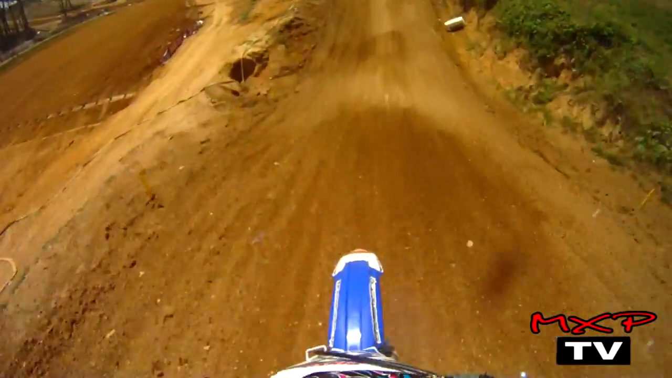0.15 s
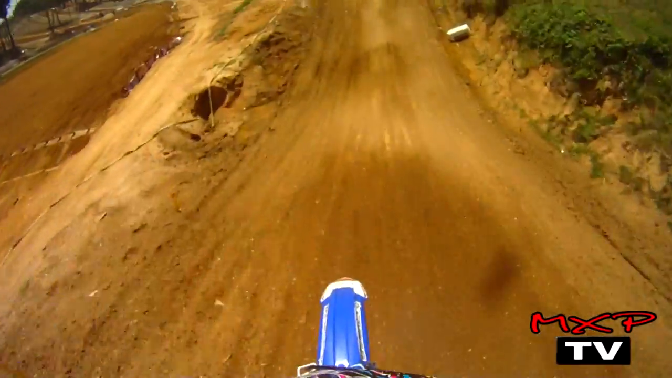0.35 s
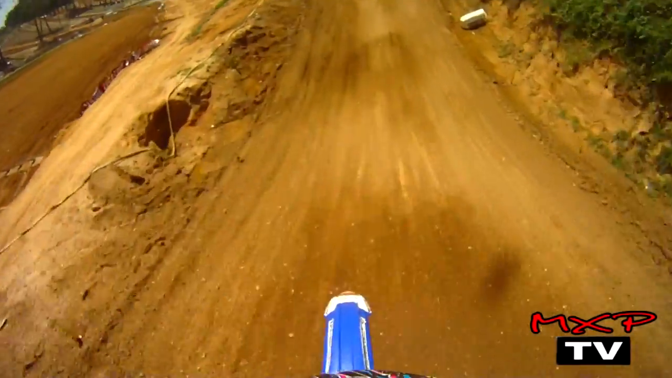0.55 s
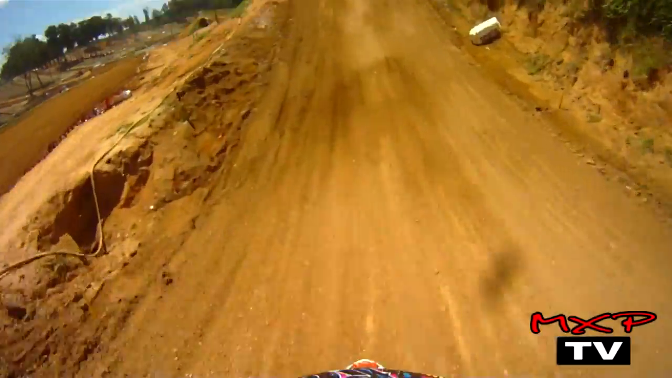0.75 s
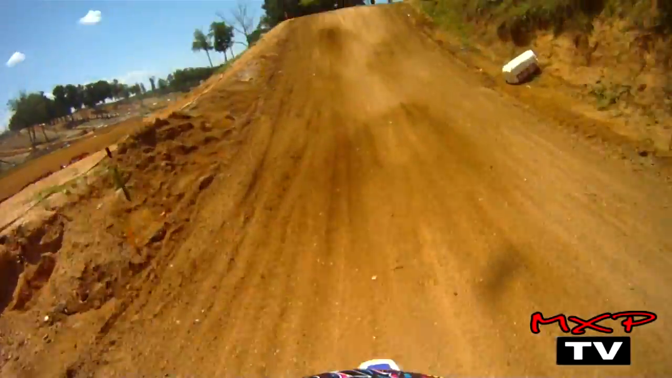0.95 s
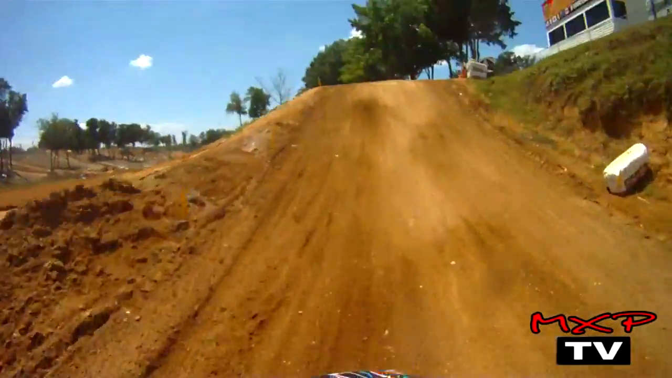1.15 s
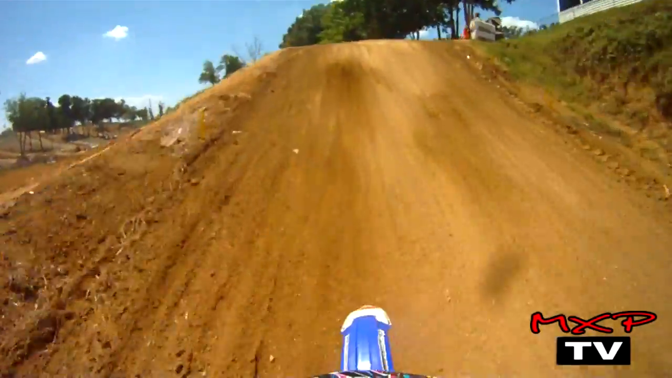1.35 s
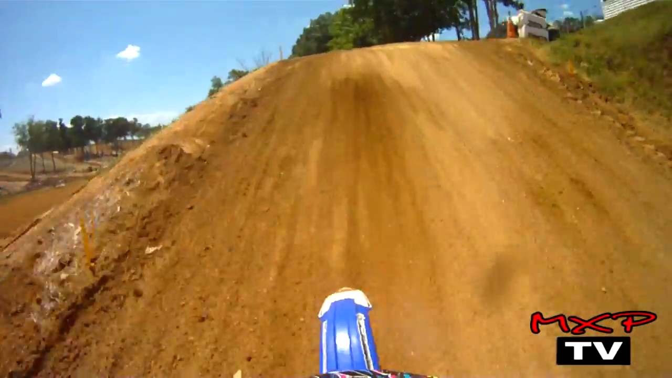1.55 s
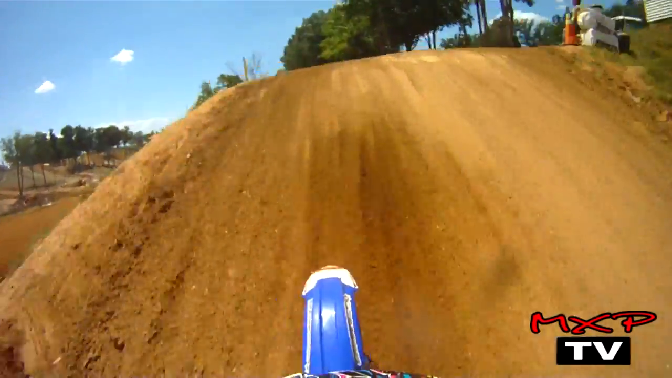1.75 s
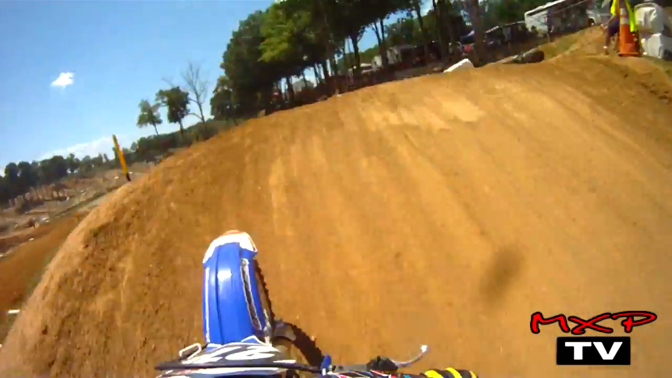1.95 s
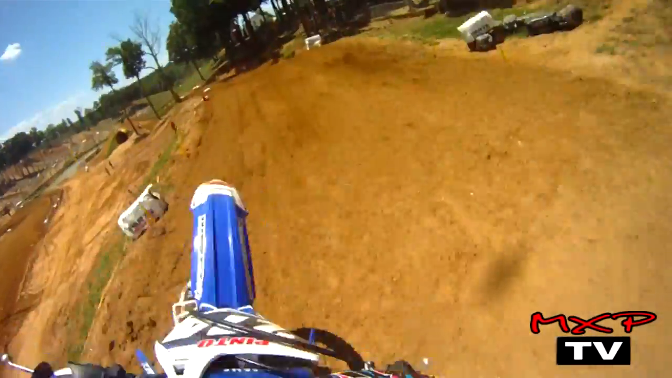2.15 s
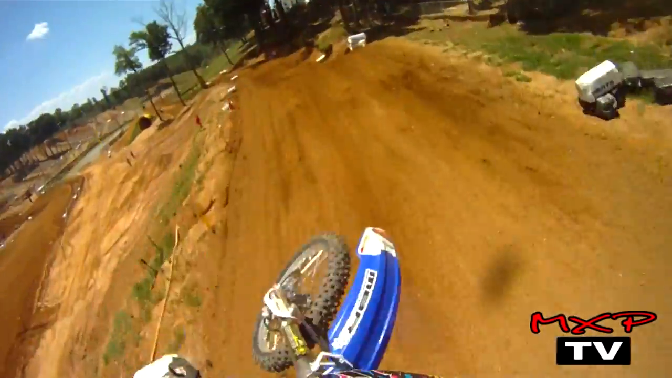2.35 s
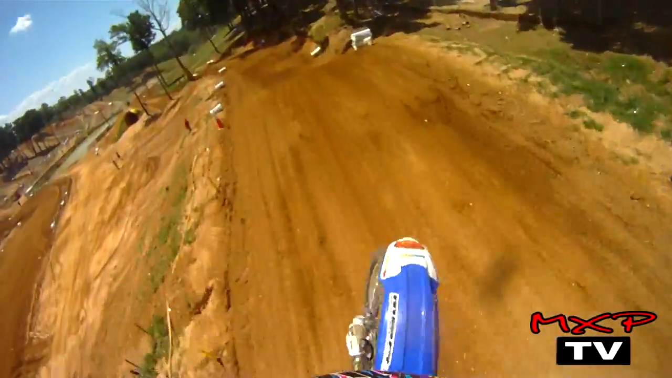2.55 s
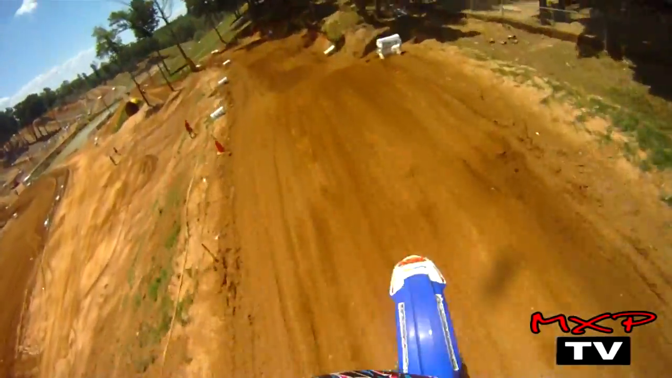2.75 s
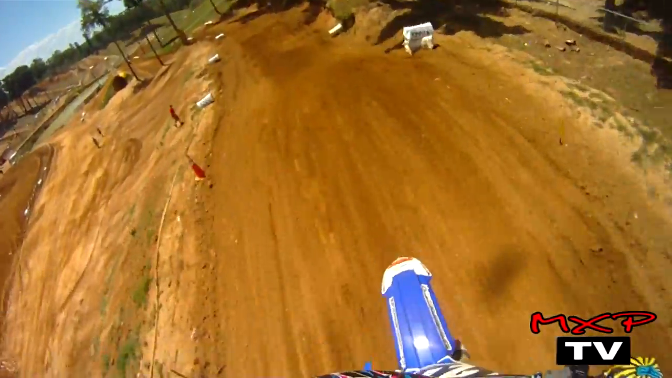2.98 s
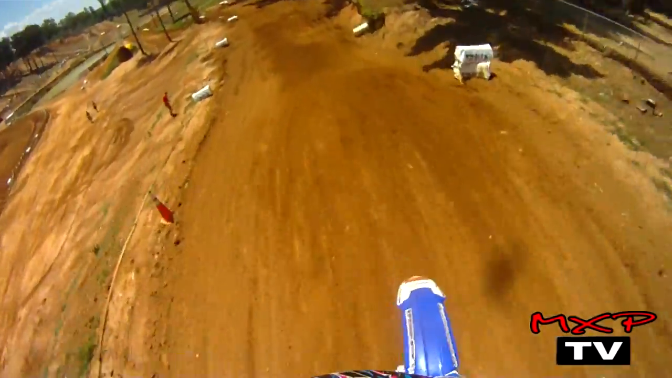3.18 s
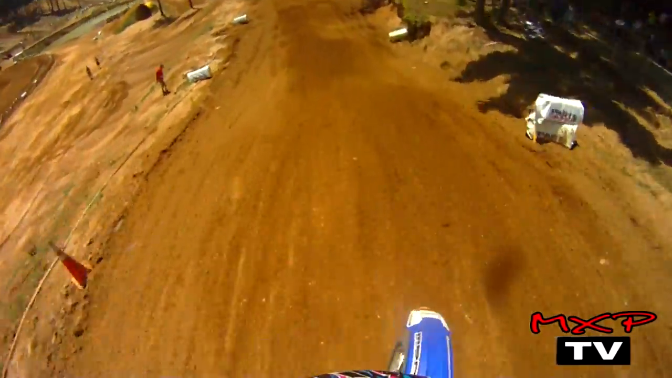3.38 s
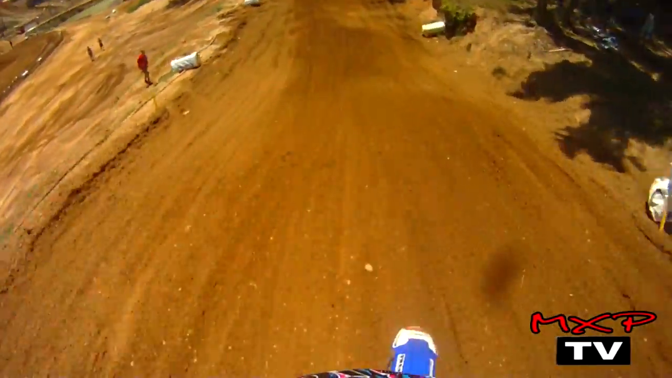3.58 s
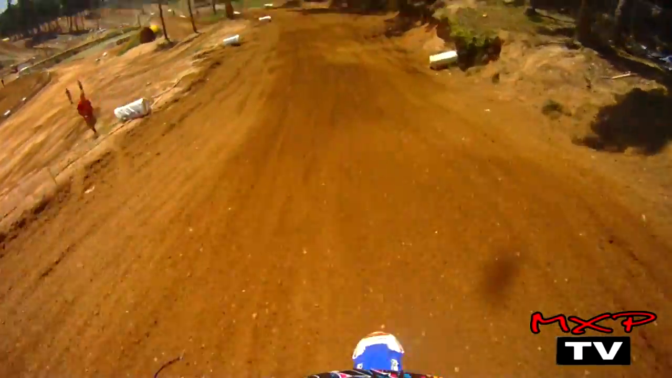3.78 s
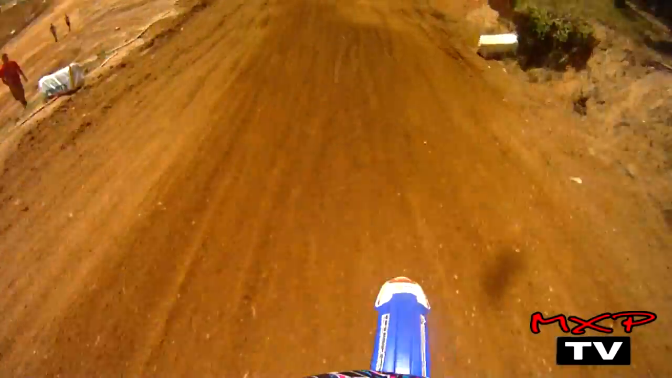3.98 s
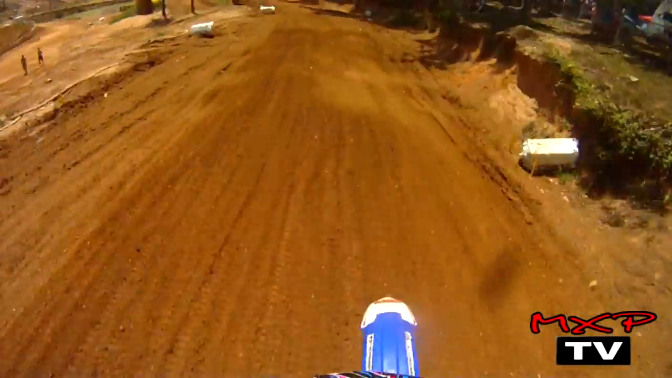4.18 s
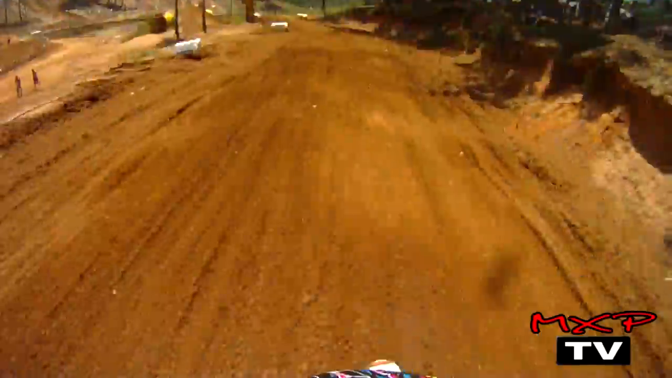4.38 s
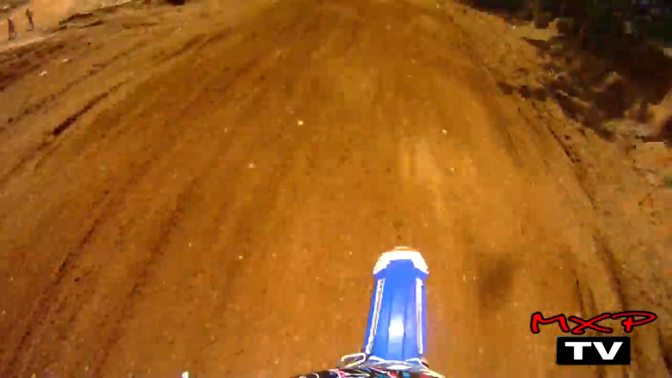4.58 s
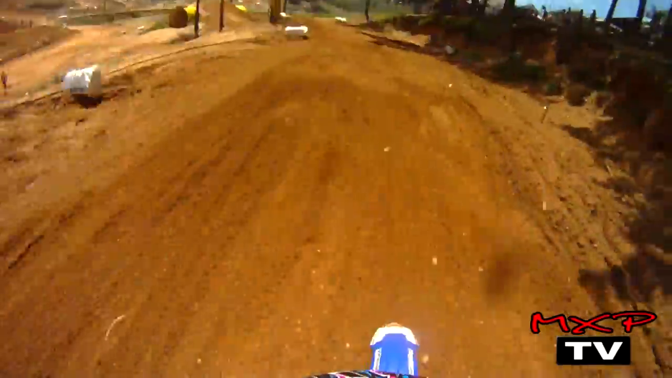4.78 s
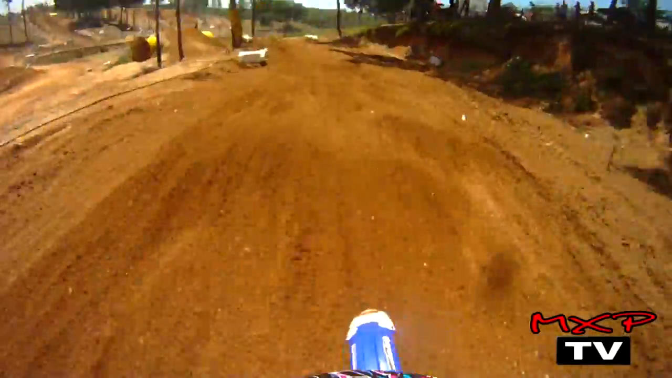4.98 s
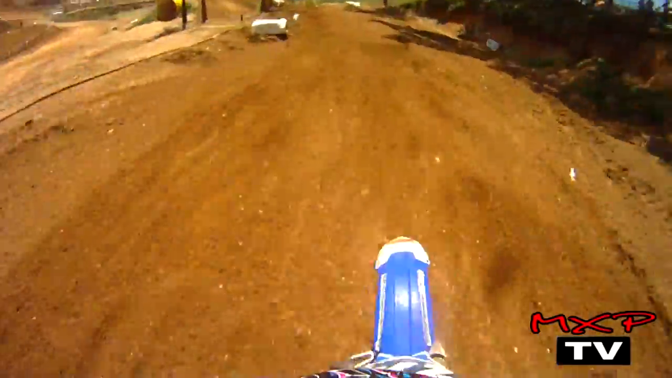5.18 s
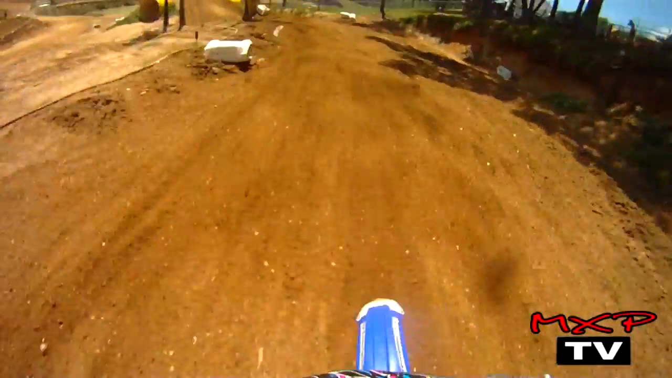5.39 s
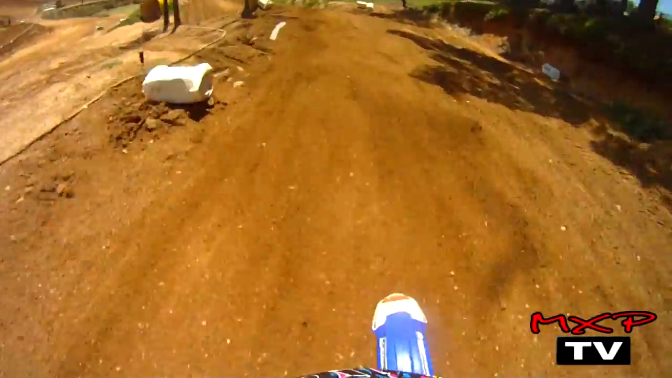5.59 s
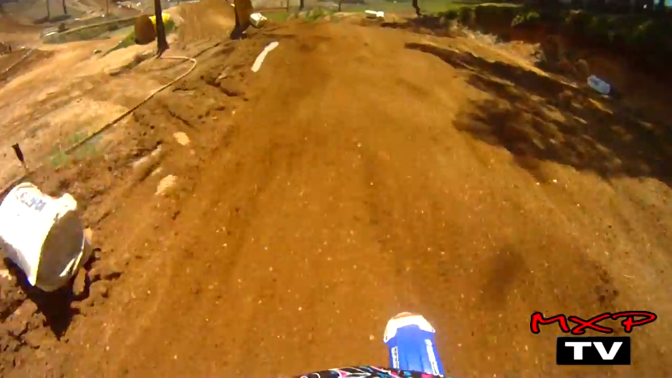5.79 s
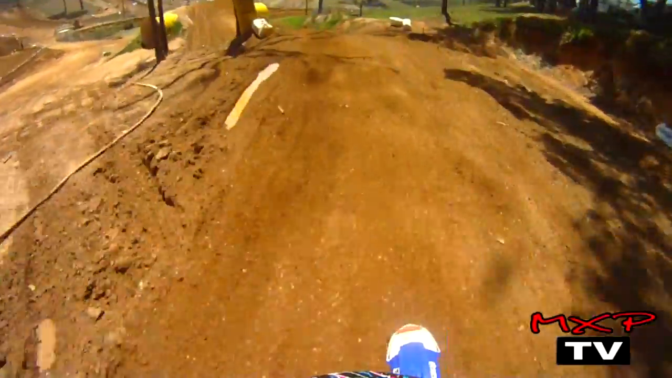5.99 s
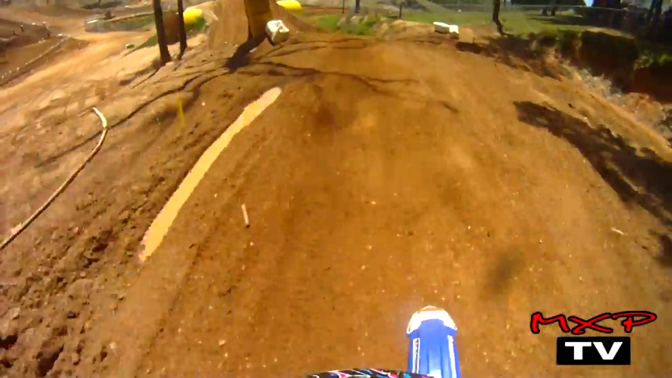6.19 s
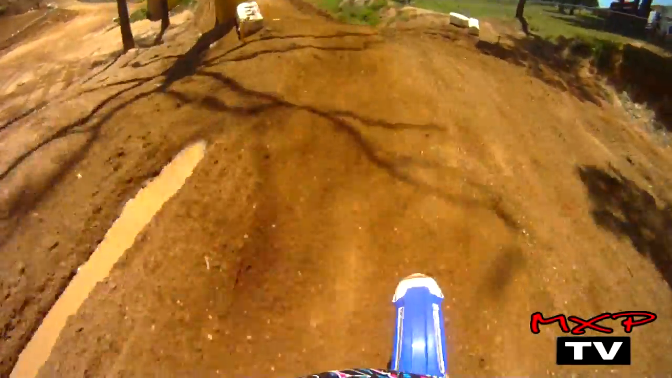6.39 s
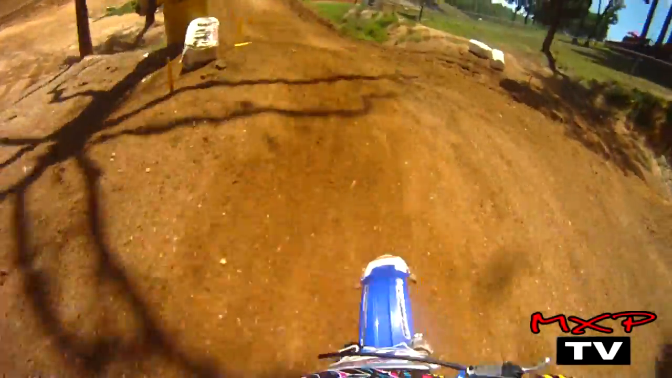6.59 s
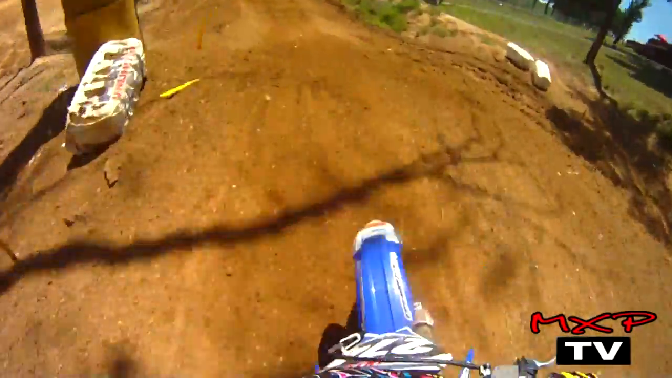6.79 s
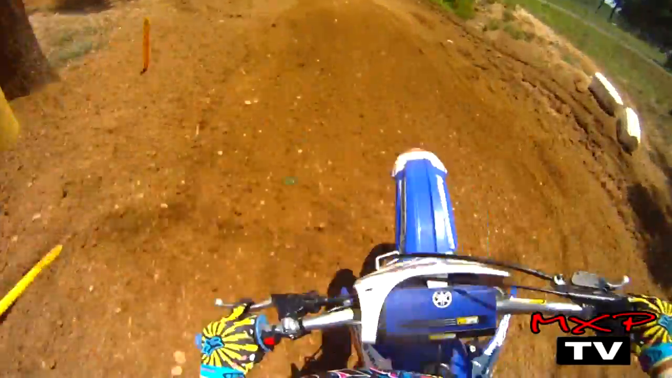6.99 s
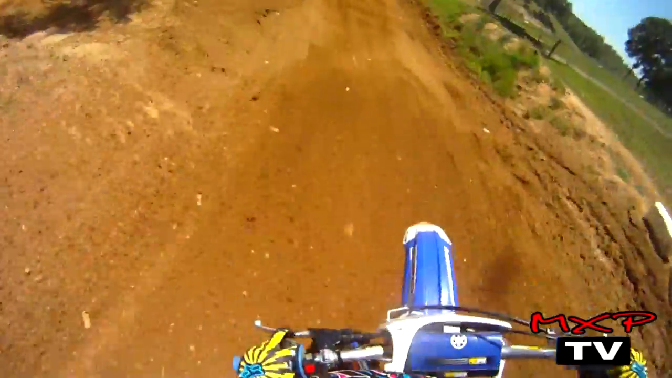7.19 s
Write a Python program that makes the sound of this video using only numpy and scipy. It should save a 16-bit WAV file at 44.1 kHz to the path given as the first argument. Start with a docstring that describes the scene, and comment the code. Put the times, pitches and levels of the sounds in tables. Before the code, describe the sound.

A two-stroke dirt bike buzzes from the rider's helmet, coasting, pulling hard in long bursts, then blipping, with wind rumble and sharp plastic knocks.

```python
"""Motocross bike from the rider's helmet

A two-stroke climbs a jump, coasts, pulls through a gear change and rolls on with blips of throttle.
Its firings are sums of harmonics coloured by pipe and frame, with noise that puffs once a turn.
The microphone rides on the helmet: a wobbling low tone and rumble are the wind, two low swings of pressure
a bump and a single shudder; decaying modes with a crack are one faint and three sharp knocks on its
plastic housing. Coarse sampling there mirrors the ringing exhaust into a metallic treble."""
import sys
import numpy as np
from scipy import signal
from scipy.fft import rfft, irfft
from scipy.io import wavfile
from scipy.ndimage import uniform_filter1d

SR = 44100
rng = np.random.default_rng(int(sys.argv[2]) if len(sys.argv) > 2 else 0)


def inscribe(sig):
    """Save sig as 16-bit PCM at rate SR to the path in sys.argv[1].

    A 1-D sig is mono; a 2-D sig holds one channel per row.
    Samples are clipped to [-1, 1] before scaling.
    """
    pcm = np.round(np.clip(np.atleast_2d(sig).T, -1, 1) * 32767)
    wavfile.write(sys.argv[1], SR, pcm.astype(np.int16))


N = 319284
TIME, FREQ = np.arange(N) / SR, np.fft.rfftfreq(N, 1 / SR)
# times at which the slow controls are worked out [s]
STEPS = np.arange(0, N + 128, 128) / SR

# wind rumble at the helmet: (frequency [Hz], relative density [dB per Hz])
WIND_RUMBLE = [(10, -9), (25, -14), (50, 4), (90, -3), (160, -9), (400, -11), (1500, -41), (6000, -70)]
# gusts that shake the helmet: (time [s], half width [s], shudder level [dB])
GUSTS = [(.99, 0.051, -22), (1.38, .025, -32), (2.9, 0.58, -47), (3.84, 0.038, -20), (4.13, 0.038, -25),
         (4.56, 0.098, -23), (5.08, 0.062, -26), (5.35, 0.11, -24.5), (6.05, .08, -23.5), (6.39, .045, -24),
         (6.78, 0.099, -26)]
# knocks on the housing: (time [s], strength [dB], pitch factor [1])
KNOCKS = [(2.149, -3, 1.0414), (4.6398, 11.5, 0.947), (5.811, 10.5, 0.946), (6.4238, 18, 1.045)]
# modes of the plastic housing before the pitch factor: (frequency [Hz], level [dB], t60 [s])
HOUSING_MODES = [(863, -17.5, 0.037), (1355, -12.5, 0.019), (2142, -5, 0.028), (2405, -0.5, 0.019),
                 (3460, -0.5, 0.0041), (5100, -12, 0.01)]
# low swings of pressure at the helmet, a bump and a single shudder: (time [s], level [dB], half width [s])
PRESSURE_SWINGS = [(3.8196, -9, 0.0031), (5.268, -15, 0.0092)]

# crank speed, one firing a turn, before the wobble: (time [s], rate [firings per second])
REVS = [(0, 153), (.53, 108), (.68, 206), (.72, 213), (.77, 188), (.82, 209), (.95, 188), (1.07, 195),
        (1.16, 189), (1.3, 187), (1.37, 185), (1.45, 196), (1.56, 184), (1.62, 192), (2.12, 183),
        (2.26, 216), (2.48, 207), (2.6, 188), (2.92, 167), (3.5, 143), (3.64, 204), (3.73, 220),
        (3.79, 188), (3.86, 174), (4.15, 200), (4.24, 219), (4.33, 228), (4.41, 194), (4.5, 193),
        (4.83, 140), (4.92, 177), (5.08, 147), (5.22, 151), (5.3, 163), (5.74, 142), (5.86, 167),
        (5.95, 197), (6.02, 167), (6.1, 168), (6.3, 143), (6.37, 154), (6.46, 135), (6.54, 154),
        (6.65, 146), (6.75, 147.6), (7.24, 135)]
# twists of the throttle, three long pulls and then blips:
# (start [s], length [s], time to open [s], time to shut [s], opening [0-1])
THROTTLE_TWISTS = [(0.497, 1.645, 0.12, 0.19, 0.98), (3.444, 0.37, 0.13, .02, .96),
                   (3.819, 0.704, 0.21, 0.081, .9), (4.809, 0.12, .06, 0.077, 0.69),
                   (5.75, 0.062, 0.033, 0.018, .4), (5.872, 0.086, 0.045, 0.041, 0.44),
                   (6.06, .05, 0.021, .05, 0.33), (6.31, 0.028, .015, .02, 0.48),
                   (6.45, 0.063, .025, 0.034, 0.8)]
# level curve of the coasting engine, added by share to each layer: (time [s], level [dB])
COASTING = [(0, -8.5), (.47, -8), (2.3, 1.6), (2.65, 0.2), (3.05, 2.4), (3.35, -0.5), (4.7, 0.4),
            (5.35, 1.5), (5.7, -1), (6.2, -0.5), (6.8, -2.5), (7.24, -3.5)]
# stutters as the engine lugs, picks up or over-revs: (time [s], half width [s], added unevenness [0-1])
STUTTERS = [(.1, 0.24, 0.31), (.6, 0.064, 0.25), (.88, .09, 0.16), (2.12, 0.15, 0.08), (3.54, .07, 0.27),
            (3.75, 0.078, 0.43), (4.14, .03, 0.36), (4.4, 0.054, .34), (4.87, 0.049, 0.23)]

# the two lowest harmonics pass the boom of the expansion chamber: (frequency [Hz], level [dB])
BOOM = [(110, -30), (150, -32.5), (185, -35), (214, -27), (236, -27.5), (266, -42), (300, -33.5),
        (340, -33.5), (385, -31.5), (420, -38.5), (470, -23)]
# honk, the lower firing harmonics, on open and on shut throttle: (frequency [Hz], relative level [dB])
HONK_OPEN = [(570, -14), (760, -9.5), (950, -3), (1050, -5.5), (1160, 6.5), (1300, -20), (1520, -6),
             (1700, -11)]
HONK_SHUT = [(400, -9), (540, -20.5), (630, 0.5), (730, -15.5), (910, -1.5), (990, -8.5), (1120, 6),
             (1300, -16.5), (1480, -5.5), (1630, -7.5), (1750, -31)]
# ring, the upper firing harmonics, on open and on shut throttle: (frequency [Hz], relative level [dB])
RING_OPEN = [(1750, -50), (1900, -10.5), (2020, -6), (2120, -3), (2200, -1.5), (2280, 6), (2440, -7),
             (2630, -6), (2830, -25), (3130, -3.5), (3380, -41), (3650, -14), (4300, -23.5), (5450, -19.5),
             (5800, -29)]
RING_SHUT = [(1750, -27), (2000, -1.5), (2280, 1.5), (2550, 1), (2670, 2), (2860, -23), (3130, 4.5),
             (3310, -15.5), (3620, 4), (3920, -6.5), (4400, -24), (4750, -11), (5430, -12), (5800, -24)]
# one harmonic catches a resonance of pipe or frame and sings out:
# (time [s], harmonic [order], half width [s], boost [dB])
SWELLS = [(.8, 1, 0.039, 7), (.88, 6, 0.067, 8.5), (1.02, 2, 0.068, 5), (1.35, 5, 0.055, -1),
          (2.16, 6, 0.089, 9.5), (3.7, 1, 0.066, 2.5), (3.9, 12, .02, 16.5), (4.445, 6, 0.0083, 8),
          (6.33, 15, .015, 17), (6.8, 11, 0.062, 8), (6.98, 19, 0.039, 16), (7.07, 12, 0.076, 22)]
# gas noise on open, mechanical noise on shut throttle: (frequency [Hz], relative density [dB per Hz])
GAS_RUSH = [(120, -14), (450, -21), (800, -11), (1120, -4), (1330, -9.5), (1780, -9), (2280, 7), (2800, -5),
            (3130, -1), (3380, -7.5), (3650, -1), (4400, -12.5), (5350, -8.5), (6000, -21)]
CLATTER = [(120, -5), (480, -11.5), (640, -3.5), (1100, 1.5), (1330, -2), (1780, -3), (2300, 7.5),
           (2880, -3.5), (3720, 2), (4100, -11.5), (4550, -14), (4780, -5.5), (5400, -14), (6000, -14.5)]
# bright, tinny rasp: (frequency [Hz], relative density [dB per Hz])
TINNY = [(1500, -40), (3800, -25), (4300, -39), (4750, 14.5), (5050, -12), (5370, 15.5), (5600, 3),
         (6000, 7)]
# moments when that rasp flares up: (time [s], half width [s], level [dB])
FLARES = [(2.11, 0.11, -24.5), (4.16, 0.013, -23.5), (5.95, 0.017, -29.5), (6.09, 0.016, -38)]
# blat of half-burnt charges in the pipe: (frequency [Hz], relative density [dB per Hz])
BURBLE = [(60, -25), (150, 6), (300, -10), (500, 4), (650, 8), (850, -24), (1150, 16), (1350, -14),
          (2500, -27)]

# how each layer answers the engine, before any trim of its own:
# (shut throttle [dB], open throttle [dB], above cruise [dB per octave], full misfire [dB], coasting share [1])
BOOM_LAW = (-13, 0.5, -1.5, 6, 1.5)
HONK_LAW = (-34.5, -28.5, -2.5, 7, 1)
RING_LAW = (-28, -14, 3.5, -4.5, 1.63)
RASP_LAW = (-36.5, -30, 2, 14.5, 1.12)

CRUISE_HZ = 190  # firing rate at which the laws add no octave term
# unevenness [0-1] at steady revs, and what each octave below CLEAN_ABOVE_HZ adds
MISFIRE_STEADY, MISFIRE_LOW, CLEAN_ABOVE_HZ = .22, 0.89, 150
HOLD_HZ, EDGE_HZ = 12000, 15500  # coarse sample rate at the microphone, and the band limit


def amp(db):
    """Amplitude of a level in dB."""
    return 10 ** (np.asarray(db) / 20)


def unit(x):
    """Scales to an rms of 1."""
    return x / np.sqrt(np.mean(x ** 2) + 1e-20)


def bell(t, s, width):
    """A smooth rise and fall around the time s."""
    return np.exp(-.5 * ((t - s) / width) ** 2)


def play(table, t=TIME):
    """The columns of a curve table at the times t."""
    s, *columns = np.transpose(table)
    return [np.interp(t, s, column) for column in columns]


def colour(points, hz):
    """Gain of a spectrum at the frequencies hz."""
    f, db = np.transpose(points)
    return amp(np.interp(np.log(hz + 1), np.log(f + 1), db))


def noise(points, lo, hi):
    """Noise of a given spectrum, with an rms of 1 between lo and hi Hz."""
    spectrum = rfft(rng.standard_normal(N)) * colour(points, FREQ)
    band = irfft(spectrum * (FREQ > lo) * (FREQ < hi), N)
    return irfft(spectrum, N) / np.std(band)


def wander(rate, t=TIME):
    """Slow chance, about rate new values a second."""
    return np.interp(t * rate, np.arange(4096), rng.standard_normal(4096))


def wind(shudder_hz=31.5, drift_hz=3.51, calm_db=-44.0, rumble_db=-53.5, gust_rumble_db=-24,
         lumpy_db=4.5, lump_rate=11):
    """The helmet shudders at its own low resonance under a rumble of turbulence; gusts drive both."""
    gust_steps = sum(amp(db) * bell(STEPS, s, width) for s, width, db in GUSTS)
    gust = np.interp(TIME, STEPS, gust_steps)
    lumps = amp(lumpy_db * wander(lump_rate))
    cycles = np.cumsum(shudder_hz + drift_hz * wander(18)) / SR
    shudder = np.sqrt(2) * np.sin(2 * np.pi * cycles)
    rumble = noise(WIND_RUMBLE, 55, 115)
    shudder_gain = amp(calm_db) * lumps + gust
    rumble_gain = amp(rumble_db) * lumps + amp(gust_rumble_db) * gust
    return shudder_gain * shudder + rumble_gain * rumble


def pressure_swings():
    """Two low swings of pressure at the helmet, a bump and a single shudder."""
    out = np.zeros(N)
    for s, db, width in PRESSURE_SWINGS:
        out -= amp(db) * (1 - ((TIME - s) / width) ** 2) * bell(TIME, s, width)
    return out


def knocks(crack_db=-8.5, crack_decay=0.0023):
    """Each knock cracks, a noise burst decaying in crack_decay [s], and rings the housing modes."""
    out, t = np.zeros(N), np.arange(4096) / SR
    for s, strength_db, pitch in KNOCKS:
        ring = sum(amp(db - 60 * t / t60) * np.sin(2 * np.pi * hz * pitch * t)
                   for hz, db, t60 in HOUSING_MODES)
        crack = amp(crack_db) * rng.standard_normal(len(t)) * np.exp(-t / crack_decay)
        out[round(s * SR):][:len(t)] += amp(strength_db) * (ring + crack)
    return out


def throttle_at(t=TIME):
    """Each twist opens the throttle, holds it and lets it fall shut."""
    twists = []
    for s, length, rise, fall, opening in THROTTLE_TWISTS:
        opened = np.clip((STEPS - s) / rise, 0, 1)
        still_open = np.clip(1 - (STEPS - s - length) / fall, 0, 1)
        twists.append(opening * opened * still_open)
    return np.interp(t, STEPS, np.clip(np.max(twists, axis=0), 0, 1))


def misfire_at(t=TIME):
    """A two-stroke fires unevenly when its revs sink low, and in short stutters."""
    low = np.maximum(np.log2(CLEAN_ABOVE_HZ / play(REVS, STEPS)[0]), 0)
    stutter = sum(depth * bell(STEPS, s, width) for s, width, depth in STUTTERS)
    return np.interp(t, STEPS, np.clip(MISFIRE_STEADY + MISFIRE_LOW * low + stutter, 0, 1))


def level(law, t=TIME):
    """Gain of a layer from throttle, revs and misfire."""
    shut_db, open_db, octave_db, misfire_db, coast_share = law
    throttle = throttle_at(STEPS)
    octaves = np.log2(play(REVS, STEPS)[0] / CRUISE_HZ)
    coasting_db = shut_db + coast_share * play(COASTING, STEPS)[0]
    db = throttle * open_db + (1 - throttle) * coasting_db
    db += octave_db * octaves + misfire_db * misfire_at(STEPS)
    return np.interp(t, STEPS, amp(db))


def crank(jitter=0.015, scatter=0.31, wobble=0.002973, wobble_rate=18):
    """Turns of the crank and strength of each firing; ruts wobble the speed, misfires scatter both."""
    turns = np.cumsum(play(REVS)[0] * (1 + wobble * wander(wobble_rate))) / SR
    misfire = misfire_at()
    late, strong = (np.interp(turns, np.arange(4096), rng.standard_normal(4096)) for _ in range(2))
    return turns + jitter * misfire * late, np.abs(1 + scatter * misfire * strong)


def puffs(turns, shut_depth=0.1, open_depth=0.19):
    """Gas noise swells once with every turn of the crank, more deeply on open throttle."""
    depth = shut_depth + (open_depth - shut_depth) * throttle_at()
    return unit(np.exp(depth * np.cos(2 * np.pi * turns)))


def burble(burble_db=-2):
    """Late, half-burnt charges blat in the pipe when the firing is most uneven."""
    blat = noise(BURBLE, 600, 1300)
    return amp(burble_db) * level(HONK_LAW) * misfire_at() ** 2 * blat


def flares():
    """Short bursts of bright rasp."""
    hiss = noise(TINNY, 3400, 5600)
    return hiss * sum(amp(db) * bell(TIME, s, width) for s, width, db in FLARES)


def rasp(rasp_db=-2):
    """Gas rushes on open throttle; with the throttle shut, piston and chain clatter take over."""
    throttle = throttle_at()
    gas, clatter = noise(GAS_RUSH, 3400, 5600), noise(CLATTER, 3400, 5600)
    mix = np.sqrt(throttle) * gas + np.sqrt(1 - throttle) * clatter
    return amp(rasp_db) * level(RASP_LAW) * mix


def firing_tones(turns, fade_db=5.0, boom_fade_db=2.5, honk_swing_db=2.0, fade_rate=20,
                 sway=0.23, sway_limit=2.0, count=38):
    """Harmonics of the firings slide through the fixed resonances of pipe and frame."""
    t = STEPS
    order = np.arange(1, count + 1)[:, None]
    hz, throttle = order * play(REVS, t)[0], throttle_at(t)
    # ground reflections shift as the rider moves, so each harmonic fades in and out on its own
    drift = np.array([wander(fade_rate, t) for _ in order])
    upper = np.clip((hz - 1650) / 200, 0, 1)  # crossover from honk to ring

    def group(opened, shut, share, law):
        """Harmonic amplitudes of one group, whose total power follows the law."""
        resonance = colour(opened, hz) ** throttle * colour(shut, hz) ** (1 - throttle)
        size = resonance * share * amp(fade_db * drift)
        return level(law, t) * size / np.linalg.norm(size, axis=0)

    size = group(RING_OPEN, RING_SHUT, upper, RING_LAW)
    honk = group(HONK_OPEN, HONK_SHUT, (1 - upper) * (order > 2), HONK_LAW)
    size += honk * amp(honk_swing_db * wander(fade_rate / 2, t))
    size[:2] = level(BOOM_LAW, t) * colour(BOOM, hz[:2]) * amp(boom_fade_db * drift[:2])
    for s, k, width, db in SWELLS:
        size[round(k) - 1] *= amp(db * bell(t, s, width))

    tones = np.zeros(N)
    for k, height in enumerate(size, 1):
        phase = 2 * np.pi * (k * turns + rng.random())
        phase += sway * min(k / 10, sway_limit) * wander(2 * fade_rate)  # sway in radians
        tones += np.sqrt(2) * np.interp(TIME, t, height) * np.cos(phase)
    return tones


def engine(clean_share=0.58, surge_db=0.99, surge_rate=18):
    """Every layer follows the strength of each firing and surges a little; misfires weaken the tones."""
    turns, strength = crank()
    steadiness = np.sqrt(np.clip(1 - (1 - clean_share) * misfire_at(), 0, 1))
    tones = firing_tones(turns) * steadiness
    gas_noise = puffs(turns) * (rasp() + flares() + burble())
    return amp(surge_db * wander(surge_rate)) * strength * (tones + gas_noise)


def scene():
    """Wind, pressure swings and knocks at the helmet, with the engine close below."""
    return (wind() + pressure_swings() + knocks() + engine())[None]


def limiter(x, threshold_db=-7, recover_db_per_s=190, lag=0.0045):
    """Gain drops a few ms after an overload and then climbs back."""
    level_db = 10 * np.log10(np.abs(uniform_filter1d(x ** 2, 132)) + 1e-12)
    fall = TIME * recover_db_per_s
    held_db = np.maximum.accumulate(level_db + fall) - fall  # each peak decays at the recovery rate
    over_db = np.maximum(held_db - threshold_db, 0)
    return x / amp(np.interp(TIME - lag, TIME, uniform_filter1d(over_db, size=176)))


def record(dry, ceiling=1.0):
    """Limiter and clipping, then coarse held samples that mirror the spectrum upward; last the band limit."""
    clipped = np.clip(limiter(dry[0]), -ceiling, ceiling)
    lowpass = np.clip((HOLD_HZ / 2 + 100 - FREQ) / 500, 0, 1)
    narrow = irfft(rfft(clipped) * lowpass, N)
    sampled = narrow * (1 + 2 * np.cos(2 * np.pi * HOLD_HZ * TIME))  # first mirror images only
    held = irfft(rfft(sampled) * np.sinc(FREQ / HOLD_HZ), N)  # treble loss of a held sample
    band_limit = signal.firwin(161, EDGE_HZ, window=("kaiser", 8), fs=SR)
    return signal.oaconvolve(held, band_limit, "same")[None]


dry = scene()
out = record(dry)
inscribe(out)
```